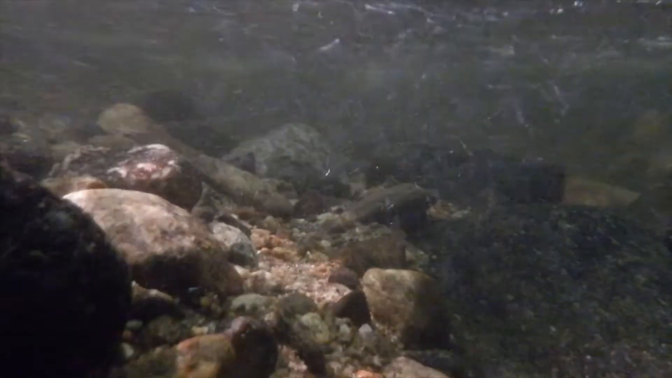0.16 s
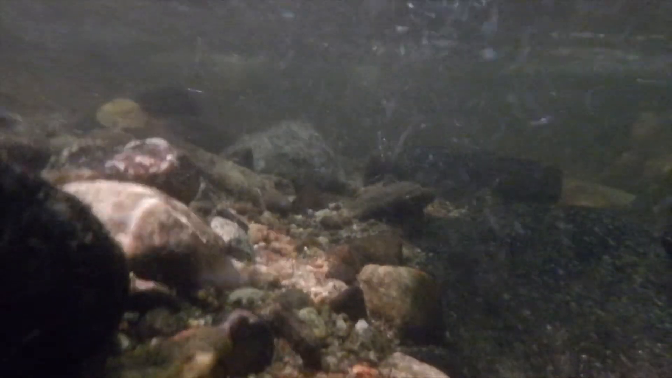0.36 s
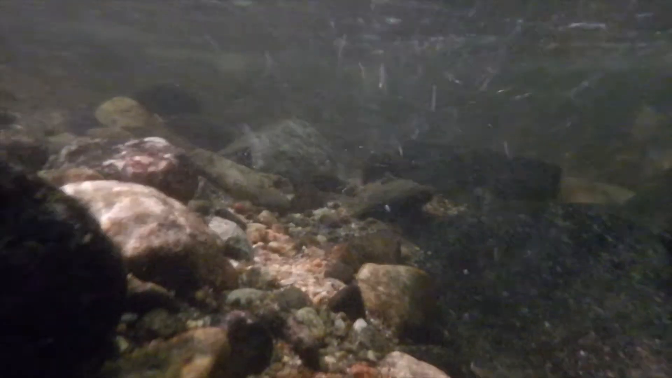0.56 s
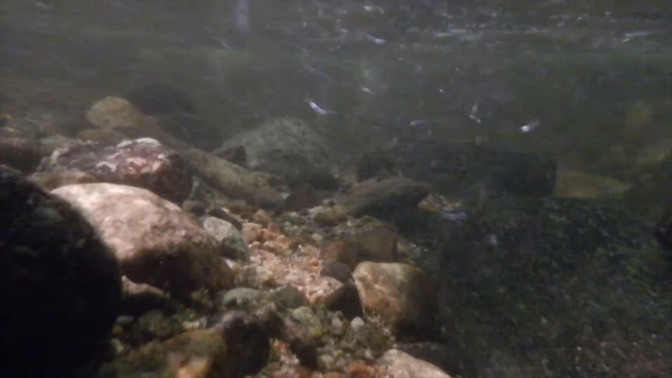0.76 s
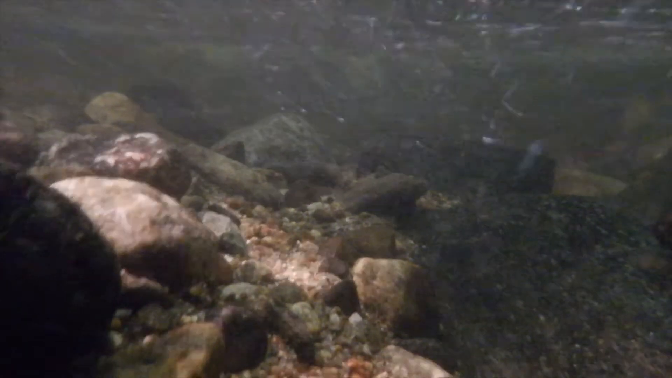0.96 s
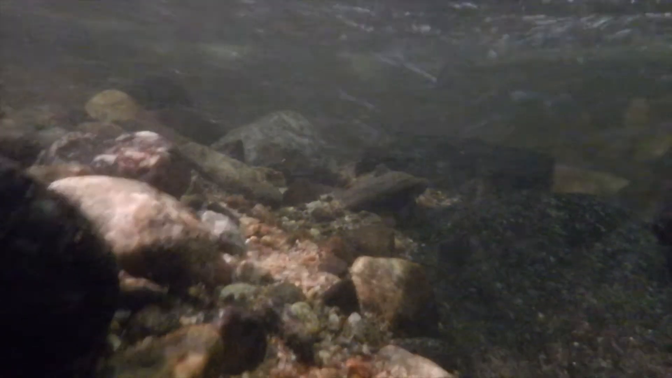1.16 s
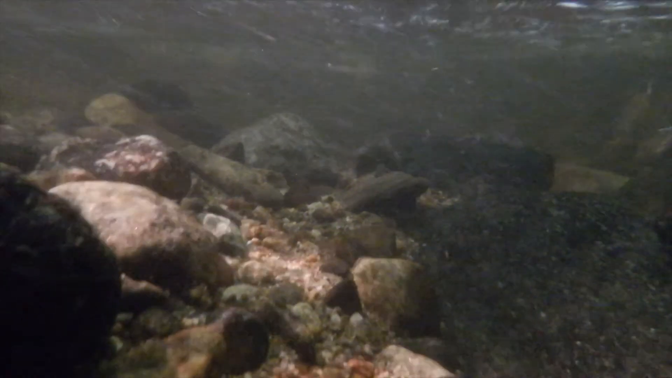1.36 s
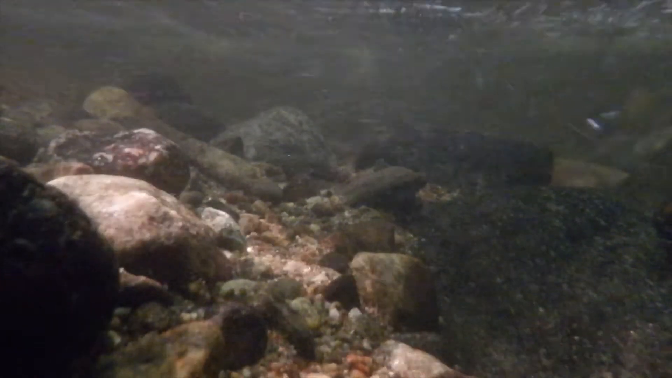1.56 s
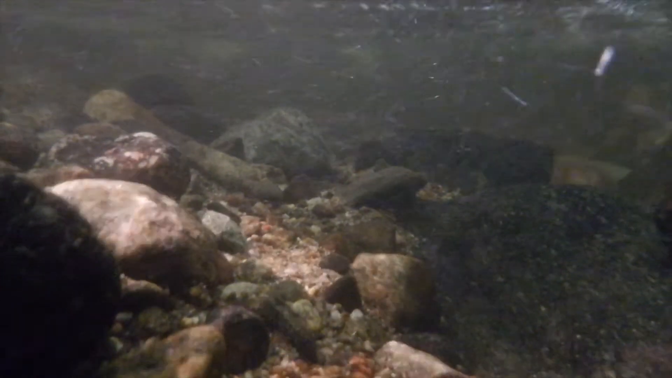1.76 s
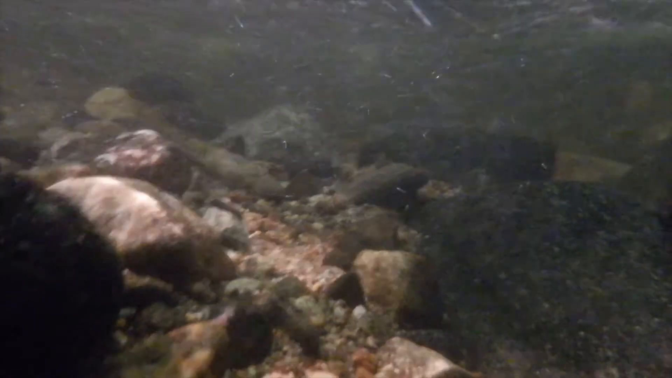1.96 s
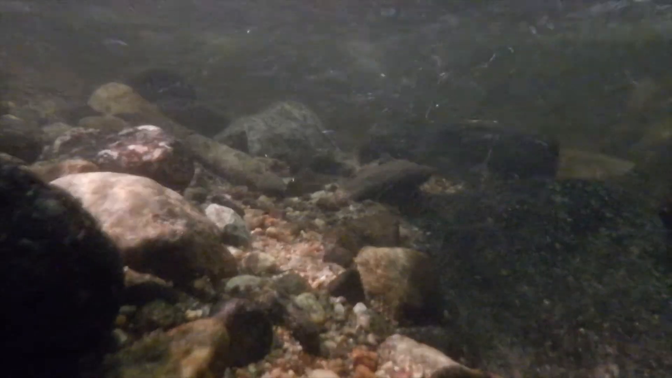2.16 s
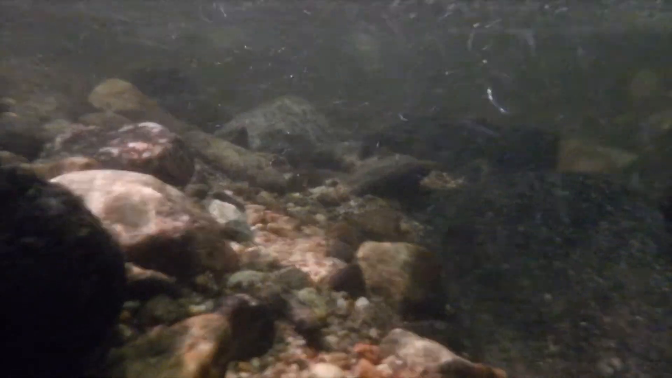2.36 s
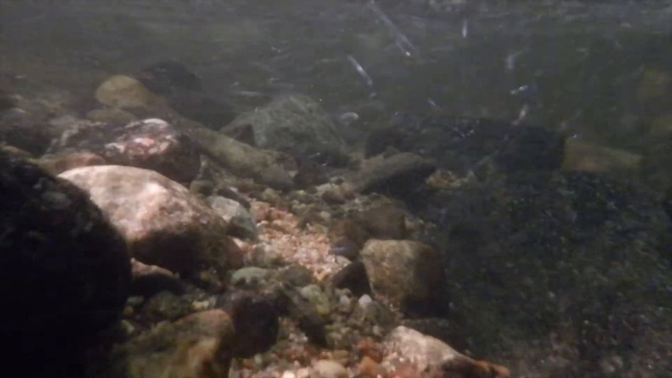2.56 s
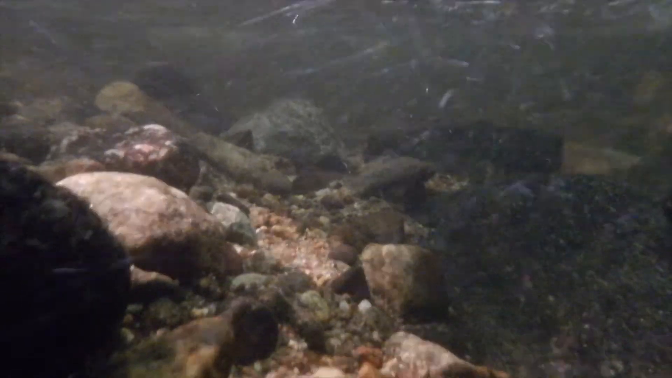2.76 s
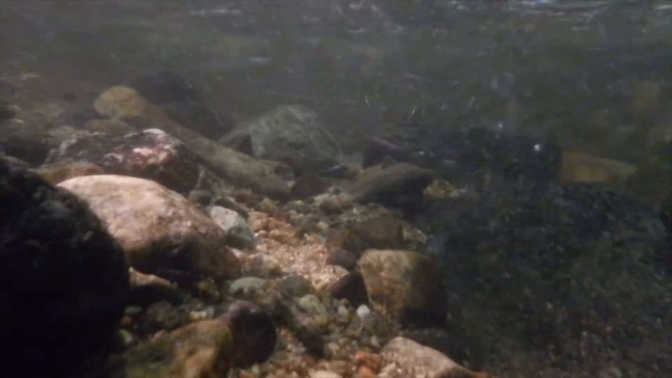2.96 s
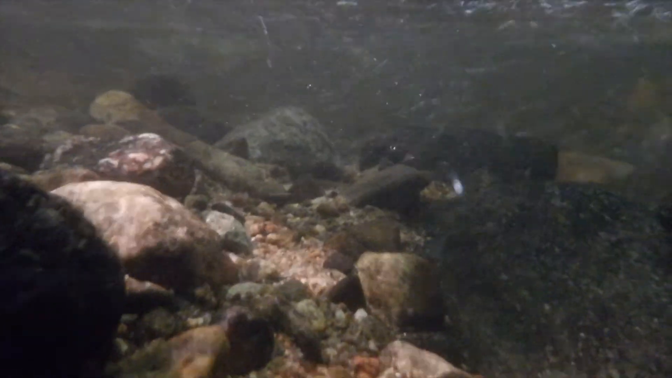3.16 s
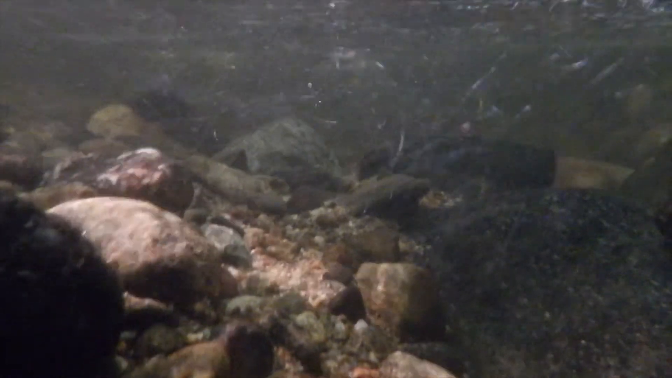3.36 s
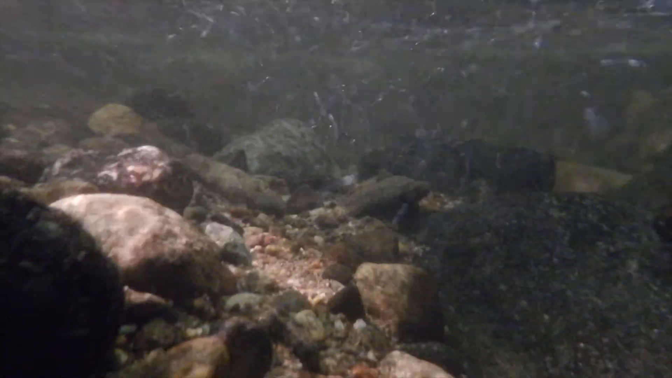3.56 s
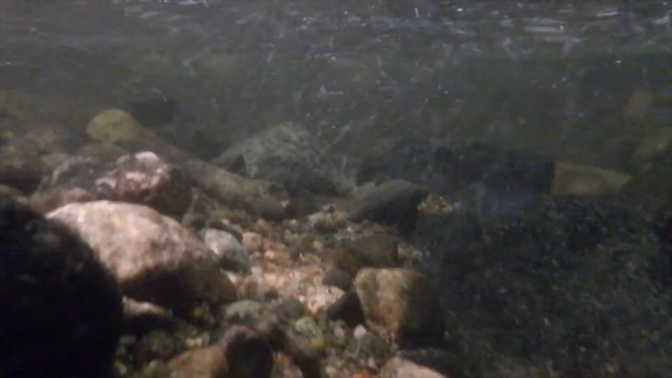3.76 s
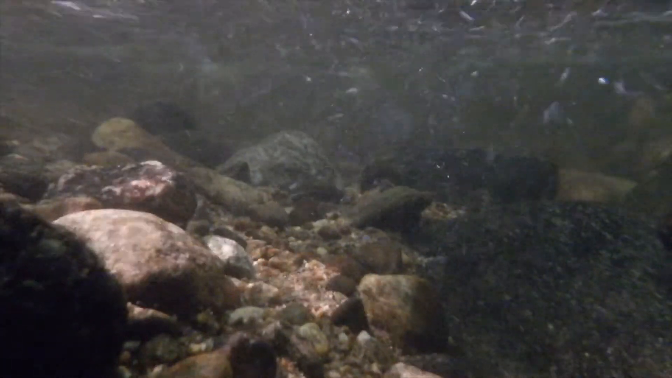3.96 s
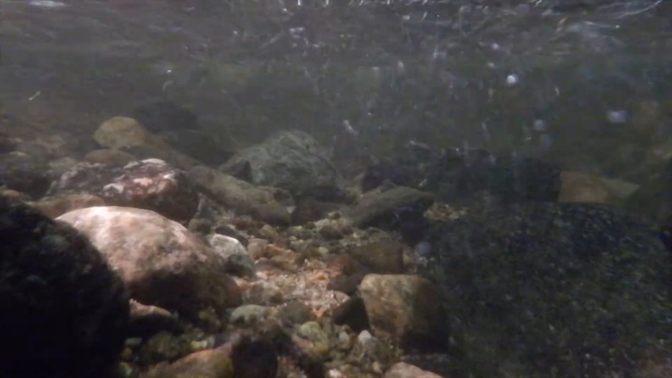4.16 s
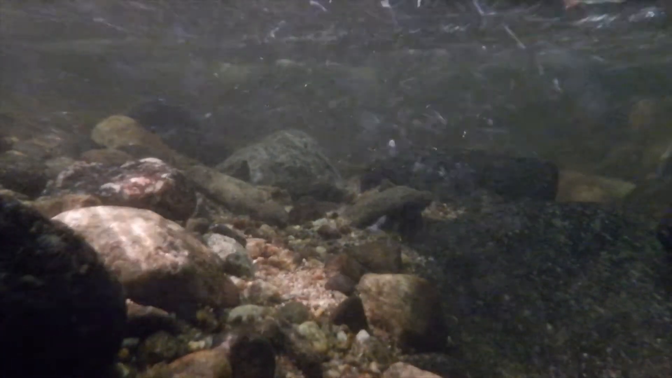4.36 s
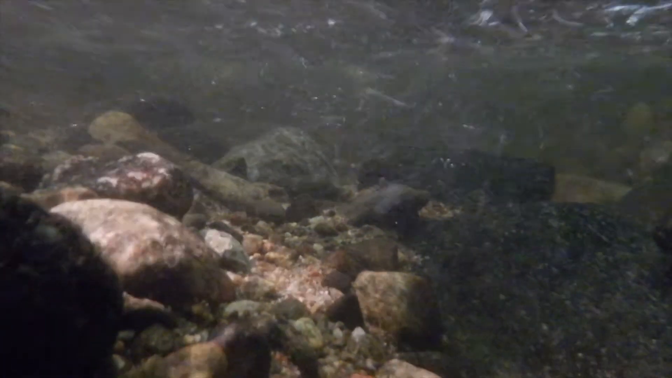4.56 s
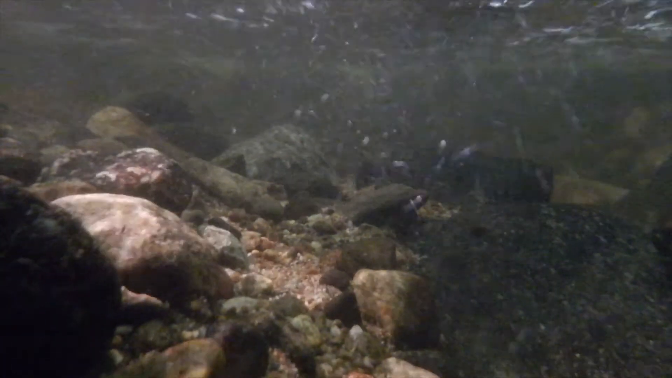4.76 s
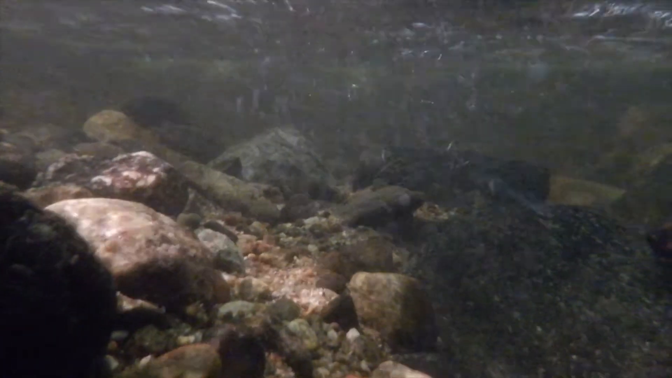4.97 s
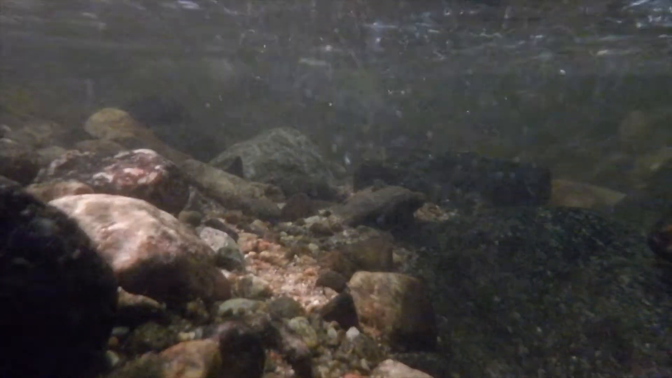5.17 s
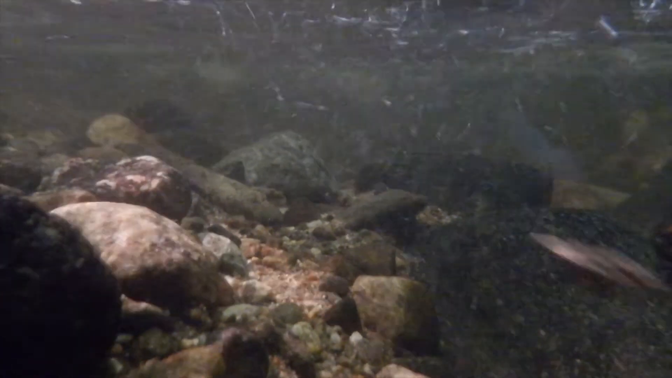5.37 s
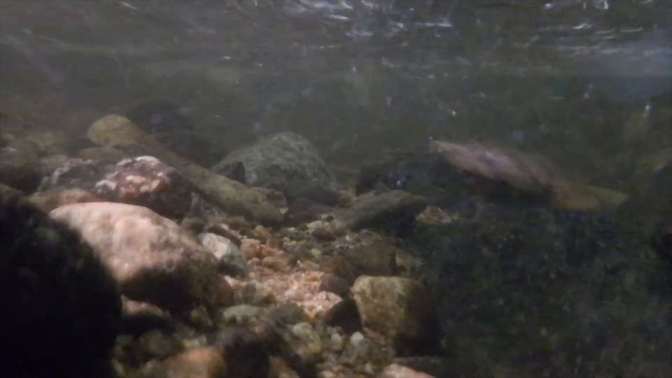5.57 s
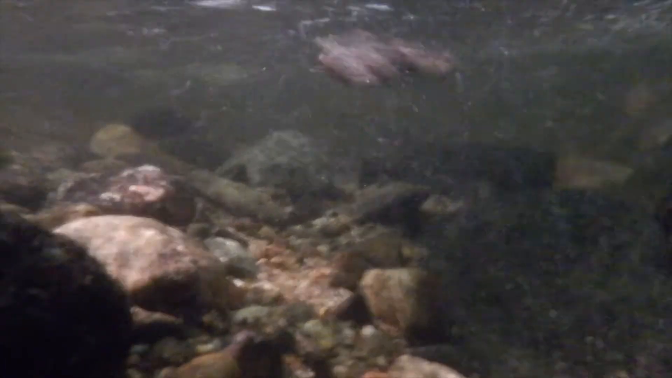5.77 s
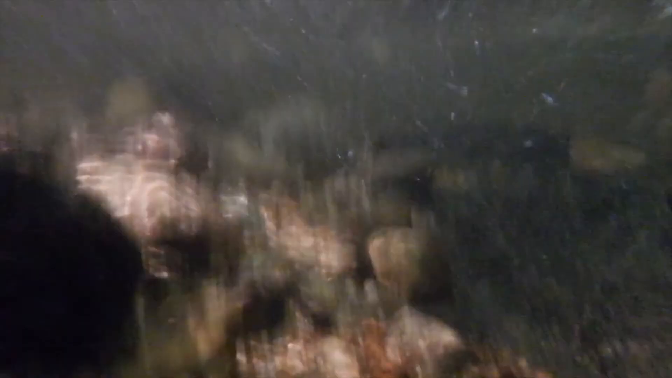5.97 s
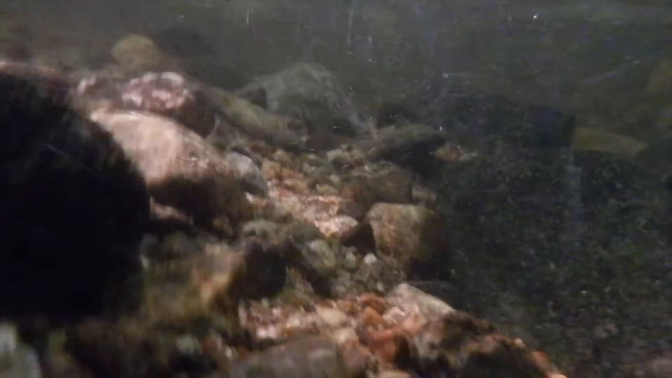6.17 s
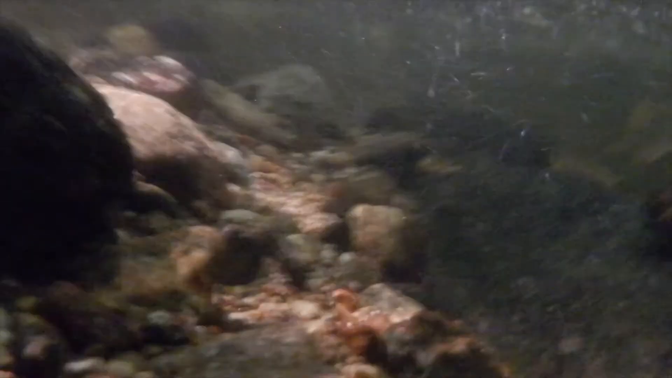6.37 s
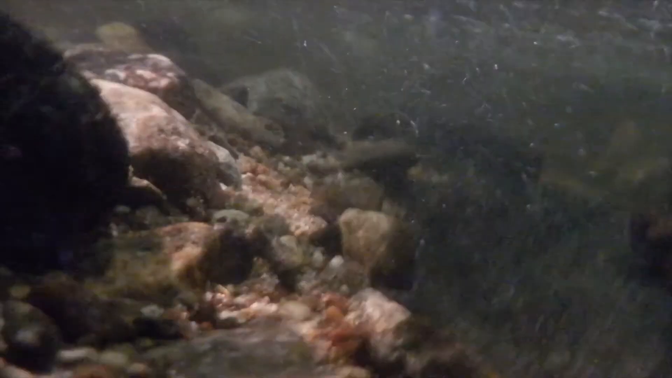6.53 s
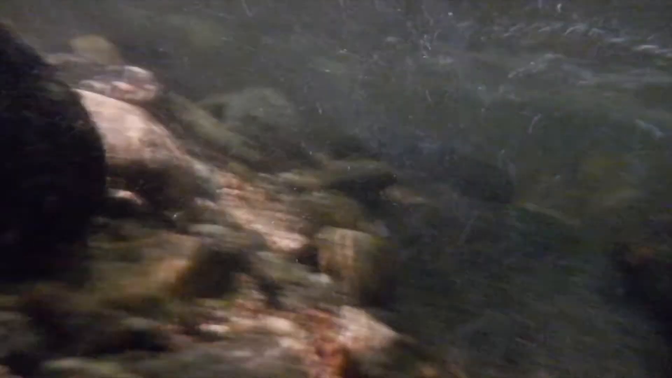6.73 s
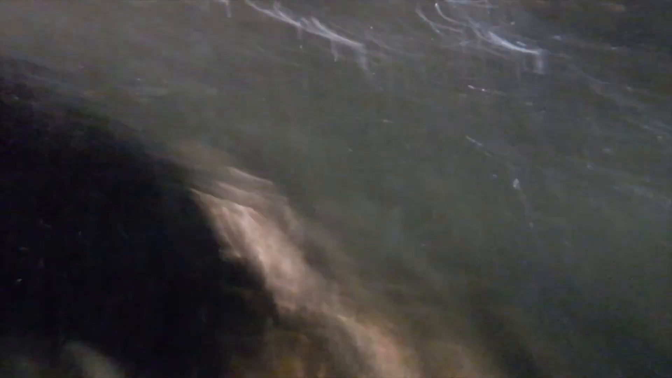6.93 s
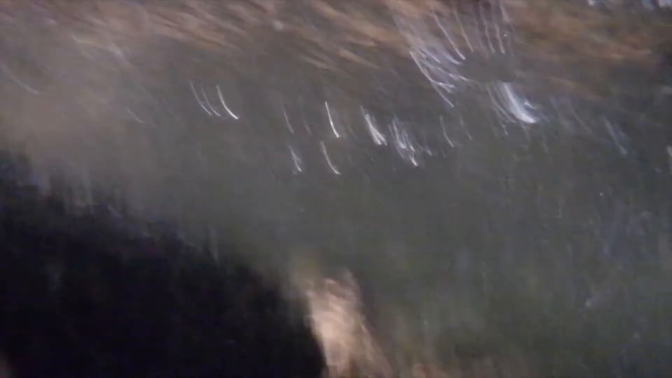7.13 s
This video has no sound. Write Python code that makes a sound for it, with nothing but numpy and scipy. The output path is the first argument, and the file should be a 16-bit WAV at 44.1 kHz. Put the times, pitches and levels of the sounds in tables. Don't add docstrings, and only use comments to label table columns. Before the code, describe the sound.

Muffled, lumpy underwater rumble of a shallow stream, broken by heavy booming knocks and one sharp crack as a submerged camera bumps stones.

```python
import sys
import numpy as np
from scipy import signal
from scipy.fft import rfft, irfft
from scipy.io import wavfile

SR = 44100
rng = np.random.default_rng(int(sys.argv[2]) if len(sys.argv) > 2 else 0)


def voltage_ratio(decibels):
    exponent = np.asarray(decibels, float) / 20
    return 10 ** exponent


def master_out(mix):
    frames = np.transpose(np.atleast_2d(mix))
    ceiling = np.clip(frames, -1, 1)
    pcm = np.round(ceiling * 32767).astype(np.int16)
    wavfile.write(sys.argv[1], SR, pcm)


N = 317520


def rms_one(x):
    return x / np.sqrt(np.mean(x ** 2) + 1e-20)


def coloured(x, points):
    hz, db = np.transpose(points)
    grid_hz = np.maximum(np.arange(len(x) // 2 + 1) * SR / len(x), 1)
    shape_db = np.interp(np.log(grid_hz), np.log(hz), db)
    return irfft(rfft(x) * voltage_ratio(shape_db), len(x))


def band(x, low_hz, high_hz):
    sos = signal.butter(2, [low_hz, high_hz], "band", fs=SR, output="sos")
    return signal.sosfilt(sos, x)


def drift(rate_hz):
    pole = np.exp(-80 * np.pi * rate_hz / SR)
    noise = rng.standard_normal(N // 40 + 2002)
    slow = signal.lfilter([1], [1, -2 * pole, pole * pole], noise)[2000:]
    return np.interp(np.arange(N) / 40, np.arange(len(slow)), rms_one(slow))


def in_time(rows):
    s, *columns = np.transpose(rows)
    return [np.interp(np.arange(N) / SR, s, column) for column in columns]


def add(out, s, burst):
    i = max(round(s * SR), 0)
    out[i:i + len(burst)] += burst[:N - i]


def ring(hz, t60_s, contact_s):
    t = np.arange(int(1.3 * t60_s * SR) + 64) / SR
    swell = 1 - np.exp(-(t / contact_s) ** 2)
    decay = voltage_ratio(-60 * (t / t60_s) ** 0.88)
    return swell * decay * np.sin(2 * np.pi * hz * t)


# (time [s], gain [dB])
DUCKS = [(0, -20.5), (2.385, -8.5), (2.501, -20), (5.05, -4.5), (5.72, -4.5), (5.89, -24.5), (5.95, -32),
         (6.501, -19.5), (6.72, -20), (7.149, -24)]
FULL_DB, DUCK_DB_PER_S, RECOVER_DB_PER_S = 0, 897.5, 23


def gain_control():
    t = np.arange(N) / SR
    dips = []
    for s, db in DUCKS:
        recover_db = RECOVER_DB_PER_S * (t - s)
        fall_db = DUCK_DB_PER_S * (s - t)
        dips.append(db + np.maximum(recover_db, fall_db))
    return np.minimum(np.min(dips, axis=0), FULL_DB)


# (time [s], level [dB])
FLOW = [(0, -25.5), (.5, -20), (.95, -20.5), (1.4, -16.5), (1.6, -24), (2.3, -20), (2.5, -23.5),
        (3.4, -19.5), (4.4, -22), (4.75, -18), (5.1, -24), (5.6, -18.5), (5.95, -21.5), (6.58, -28.5),
        (6.72, -3.5), (6.95, -17.5), (7.08, -12), (7.2, -23)]
# (frequency [Hz], density [dB per Hz])
RUMBLE_COLOUR = [(12, -36), (20, -12.5), (54, -5), (159, 2.5), (181, -2), (228, -8), (339, -35.5),
                 (418, -37.5), (549, -50), (3000, -79.5), (3900, -110), (6600, -120)]
HAZE_DB = -20.5
DEEP_DB, UPPER_DB, TILT_WANDER_DB = 8, -0.84, 2.5
DEEP_DUCKS = 0.64
LIFT_S, LIFT_DEEP_DB = 5.95, -18.5


def rumble(gain_db, lumpy_db, shared_db):
    rumble_db = in_time(FLOW)[0] + gain_db
    noise = rms_one(coloured(rng.standard_normal(N), RUMBLE_COLOUR))
    together_db = shared_db * drift(30.0)
    deep_db = DEEP_DB + TILT_WANDER_DB * drift(3.0)
    upper_db = UPPER_DB + TILT_WANDER_DB * drift(18.0)
    deep_db += (DEEP_DUCKS - 1) * gain_db
    deep_db += LIFT_DEEP_DB * (np.arange(N) > LIFT_S * SR)
    bands = [(10.1, 54.8, deep_db), (52.4, 85, -3.0), (110, 180, 0.0053), (215.4, 371, upper_db)]
    boom = 0
    for low_hz, high_hz, tilt_db in bands:
        level_db = rumble_db + tilt_db + lumpy_db * drift(1.6) + together_db
        boom = boom + band(noise, low_hz, high_hz) * voltage_ratio(level_db)
    boom = signal.sosfilt(signal.butter(3, 520, fs=SR, output="sos"), boom)
    haze = band(noise, 640, 2600) * voltage_ratio(HAZE_DB + gain_db + 0.85 * drift(8.5))
    return boom + haze


# (frequency [Hz], density [dB per Hz])
HISS_COLOUR = [(1200, -33.5), (2500, -5), (4000, -5.5), (8000, -4), (12000, -4), (16000, 1)]
WHINE_HZ = [9378, 5356, 15703]
# (level over hiss [dB], flicker [per s], flicker depth [dB])
WHINE = [(-14, 6.0, 5.5), (-23.5, 5.0, 2.5), (-11.5, 60.0, 4.5)]
# (time [s], level [dB])
WHINE_ON = [
    (0, -30),
    (1.75, -30),
    (1.85, 0),
    (2.75, 0),
    (4.65, 0),
    (4.75, -30),
    (7.2, -30),
]
HISS_DB, CONVERTER_DB = -75, -88
BLIP_FIRST_S, BLIP_EVERY_S, BLIP_HZ, BLIP_S = .0658, .06674, 12000, .003
BLIP_DB, BLIP_SPREAD_DB, WEAK_BLIP_DB = -2.5, 2.5, -4.5
CIRCUIT_TOP_HZ = 15850


def circuit(gain_db):
    t = np.arange(N) / SR
    tones = []
    for hz, (db, rate_hz, depth_db) in zip(WHINE_HZ, WHINE):
        tones.append(voltage_ratio(db + depth_db * drift(rate_hz)) * np.sin(2 * np.pi * hz * t))
    tones[0] = tones[0] * voltage_ratio(in_time(WHINE_ON)[0])

    turn = np.round((t - BLIP_FIRST_S) / BLIP_EVERY_S).astype(int) + 1
    spread_db = BLIP_SPREAD_DB * rng.standard_normal(turn[-1] + 1)[turn]
    blip_db = BLIP_DB + WEAK_BLIP_DB * (turn % 2) + spread_db
    from_blip_s = t - BLIP_FIRST_S - (turn - 1) * BLIP_EVERY_S
    blips = voltage_ratio(blip_db) * np.exp(-(from_blip_s / BLIP_S) ** 2) * np.sin(2 * np.pi * BLIP_HZ * t)

    hiss = rms_one(coloured(rng.standard_normal(N), HISS_COLOUR)) + sum(tones) + blips
    converter = voltage_ratio(CONVERTER_DB) * band(rng.standard_normal(N), 300, 13000)
    noise = voltage_ratio(HISS_DB + gain_db) * hiss + converter
    return signal.sosfilt(signal.ellip(10, .5, 40, CIRCUIT_TOP_HZ, fs=SR, output="sos"), noise)


# (frequency [Hz], t60 [s])
SHELL = [(340, .022), (590, .02), (800, .016), (1130, .022), (1500, .012), (2050, .01), (2800, .008)]
# (time [s], level [dB], fall per mode [dB], spot [0 rim - .5 middle])
TAPS = [(.002, -41.5, -1.5, .02), (.920, -57, -2, 0.16), (2.101, -41, -7.5, 0.028), (2.303, -22, -5, .25),
        (2.310, -33.5, -15, .02), (2.328, -39, -5, 0.051), (2.347, -45, -7, .02), (2.3645, -41.5, -2, .38),
        (3.786, -38, -10, 0.28), (4.336, -49, -9, 0.018), (4.741, -43.5, -1, .25),
        (4.861, -35.5, -10.5, .42), (5.012, -34.5, -4.5, 0.0209), (5.627, -44, -4, .4),
        (5.645, -47.5, -0.5, .25), (5.76, -37.5, -2, 0.11), (5.803, -55, 0, 0.016), (5.818, -32, -1, .45),
        (5.8661, -21.5, -6.5, .02), (5.868, -24.5, -1.5, .25), (6.4308, -10.5, -7.5, .02),
        (6.51, -46, -8, 0.017), (6.654, -28, -3.5, 0.25), (6.852, -46, -2, 0.19), (6.925, -49.5, -6, .24),
        (6.9891, -28, -3, 0.023), (7.016, -18.5, -20, .02), (7.031, -9, -10, .23), (7.064, -15, -18, 0.28),
        (7.074, -28.5, -18, .02)]


def taps():
    out = np.zeros(N)
    extra_db = [1.5, 0.5, 2, -5.5, -0.5, -1.5, -9.0]
    for s, db, fall_db, spot in TAPS:
        for k, (hz, t60_s) in enumerate(SHELL):
            shape = np.hypot(np.cos((k + 1) * np.pi * spot), .05)
            level = voltage_ratio(db + 5.5 + k * fall_db + extra_db[k])
            add(out, s, level * shape * ring(hz, t60_s, contact_s=0.001))
    return out


# (time [s], peak [dB])
TICKS = [(0.002, -46), (5.6765, -52), (5.6795, -53.5), (5.6855, -51), (2.306, -47.5), (2.314, -53),
         (2.351, -61), (2.364, -53.5), (5.013, -50.5), (5.821, -66), (5.866, -59.5), (5.870, -50),
         (6.431, -52.5), (6.658, -66), (6.989, -49)]


def ticks():
    out = np.zeros(N)
    noise = rng.standard_normal((len(TICKS), 256))
    t = np.arange(256) / SR
    for (s, db), grains in zip(TICKS, noise):
        add(out, s, voltage_ratio(db) * np.exp(-t / 0.00073) * grains)
    return band(out, 2500, 15000)


# (time [s], peak [dB], length [s])
CRACK = [(0.004, -51, 0.00094), (2.311, -46.5, 0.0056), (2.36, -45.5, 0.0055), (4.74, -50, 0.0014),
         (5.032, -64, 0.002), (5.646, -39.5, 0.0029), (5.6537, -25, 0.0011), (5.6560, 4, .0008),
         (5.6573, -9.5, 0.0018), (5.676, -42.5, .0015), (5.679, -55, 0.00081), (5.684, -36, 0.0028),
         (5.82, -44, 0.0027), (2.318, -53.5, .014), (2.343, -61, 0.0091), (5.695, -53.5, .008)]
# (frequency [Hz], density [dB per Hz])
CRACK_COLOUR = [(240, -41), (400, -5.5), (765, 3), (1090, -10.5), (1510, -2), (2180, -8.5), (2510, -17),
                (2930, -7.5), (3310, -36.5), (3870, -26.5), (4110, -51), (5030, -24.5), (7170, -17.5),
                (14100, -26.5), (16000, -36.5)]
# (frequency [Hz], level [dB], t60 [s])
CRACK_RING = [(1840, -28, 0.045), (3730, -38, 0.037), (5500, -58, 0.02)]


def crack():
    out = np.zeros(N)
    noise = rng.standard_normal((len(CRACK), 1024))
    t = np.arange(1024) / SR
    for (s, db, length_s), grains in zip(CRACK, noise):
        envelope = (1 - np.exp(-t / 0.000095)) * np.exp(-(t / length_s) ** 2)
        add(out, s, voltage_ratio(db) * envelope * grains)
    out = voltage_ratio(6.5) * coloured(out, CRACK_COLOUR)
    main_s = CRACK[7][0]
    for hz, db, t60_s in CRACK_RING:
        add(out, main_s, voltage_ratio(db) * ring(hz, t60_s, contact_s=0.00059))
    return out


# (time [s], peak [dB], pitch
# [Hz])
SLAPS = [(.462, -18.5, 67), (.632, -2, 58.1), (1.353, -22, 65.6), (2.052, -24.5, 52.4),
         (2.693, -23.5, 36.5), (3.399, -13.5, 112.7), (3.495, -6.5, 63), (3.54, -13.5, 86),
         (3.677, -9, 58.7), (4.004, -14.5, 85), (4.27, -13.5, 121.4), (4.391, -15, 49.3),
         (4.41, -9.5, 60.6), (4.472, -10.5, 111), (5.017, 1.5, 63.6), (5.173, -9.5, 83.6), (5.809, 0, 115),
         (5.8705, -2, 92.2)]
SLAP_CYCLES = .8
# (time [s], peak [dB], pitch [Hz], length [cycles])
SWELLS = [(0.536, -24, 81.5, 4.8), (0.797, -19, 134.3, 3.1), (1.1, -25.5, 259, 10), (.95, -18, 168.3, 9.8),
          (1.06, -20.5, 145.7, 8.3), (1.165, -15, 77.8, 3.5), (1.29, -21, 232, 8.9), (1.305, -19, 85, 7.5),
          (1.413, -14, 205, 4.7), (1.503, -25, 86, 3.6), (1.51, -8, 161.7, 3.87), (1.723, -14.5, 165.4, 5),
          (1.762, -10.5, 37, 1.43), (1.799, -4.5, 152, 2.6), (1.821, -16, 52.2, 5.2), (1.79, -20, 224, 5.1),
          (3.223, -12.5, 138, 2.4), (3.313, -18, 91, 5.1), (3.742, -17.5, 37.6, 1.7),
          (3.793, -16.5, 181, 7.1), (4.109, -12.5, 152, 1.5), (4.681, -17.5, 85, 5.5),
          (4.815, -17.5, 161, 5.3), (5.063, -7, 77, 1.33), (5.226, -15, 83.1, 5.2),
          (5.486, -16.5, 158, 4.5), (5.568, -9, 140.6, 3.44), (5.772, -8, 77.4, 1.6),
          (6.83, -19.5, 76.7, 4.7), (7.102, -12, 150.6, 5.4)]


def surges():
    out = np.zeros(N)
    slaps = [(*slap, SLAP_CYCLES) for slap in SLAPS]
    for s, db, hz, cycles in [*slaps, *SWELLS]:
        spread_s = np.clip(cycles, .4, 9) / hz / 2.36
        t = np.arange(-4 * spread_s, 4 * spread_s, 1 / SR)
        envelope = np.exp(-(t / spread_s) ** 2 / 2)
        add(out, s + t[0], -voltage_ratio(db) * envelope * np.cos(2 * np.pi * hz * t))
    return out


# (time [s], peak [dB], frequency [Hz], t60 [s])
PINGS = [(.57, -62, 1320, .02), (.92, -57, 1300, 0.022), (1.73, -56.5, 5160, 0.0083),
         (4.669, -62, 5400, 0.013), (5.8656, -5.5, 327, 0.047), (6.4308, -12.5, 522, 0.014),
         (6.4316, -15, 689, 0.017), (6.4312, -26, 1080, 0.019), (6.9886, -12, 560, 0.047),
         (7.015, -14, 560, 0.028), (7.031, -17, 520, 0.028)]


def pings():
    out = np.zeros(N)
    for s, db, hz, t60_s in PINGS:
        add(out, s, voltage_ratio(db) * ring(hz, t60_s, 0.42 / hz))
    return out


# (time [s], length [s], level [dB])
SCRAPES = [(2.073, 0.094, -60), (2.289, 0.052, -52), (5.613, 0.11, -45.5), (5.802, 0.033, -60.5),
           (6.44, 0.077, -68), (6.667, 0.033, -65), (6.802, 0.1, -62.5), (6.896, 0.054, -63.5),
           (7.022, 0.068, -54)]


def scrapes():
    hits = rng.standard_normal(N) * (rng.random(N) < 2500 / SR)
    grains = hits * voltage_ratio(3.0 * rng.exponential(1, N).clip(0, 3))
    grains = rms_one(band(band(grains, 220, 720), 280, 1800))
    stroke = np.zeros(N)
    for s, length_s, db in SCRAPES:
        add(stroke, s, voltage_ratio(db) * np.hanning(int(length_s * SR)) ** .5)
    return stroke * grains


# (time [s], peak [dB], frequency [Hz], t60 [s])
KNOCKS = [(2.299, 6, 110, 0.082), (2.308, 3, 80.5, 0.081), (2.32, 2.5, 60.5, 0.056), (2.346, .5, 110, 0.15),
          (2.356, 7, 76.8, 0.081), (2.421, -6.5, 110, 0.054), (2.434, 2, 104.2, .12),
          (5.656, -1.5, 134.9, 0.26), (5.676, -1, 55.2, 0.094), (5.684, -3, 142.6, 0.15),
          (5.8136, 3.5, 140, 0.069), (5.875, 0, 128, 0.087), (5.986, -28.5, 124, 0.062),
          (6.4394, -10, 139.8, 0.13), (6.509, -28.5, 152.6, 0.16), (6.655, 0, 158, .13),
          (6.842, -8.5, 155, 0.069), (6.919, -18.5, 139.7, .059), (6.9948, 0, 159.5, 0.11),
          (7.014, 5.5, 164.8, 0.041), (7.03, -11, 138.4, 0.15), (7.056, -5, 110, 0.14),
          (7.07, -6, 148.5, .11)]
CONTACT_CYCLES = .3
# (time [s], peak [dB], frequency [Hz], t60 [s], direction [+1 or -1])
RAPS = [(5.8643, 3.5, 160, 0.022, 1), (6.4314, 8.5, 205, 0.027, 1), (6.9883, 5.5, 199, 0.032, -1)]
RAP_CONTACT_S = 0.0011


def knocks():
    out = np.zeros(N)
    for s, db, hz, t60_s in KNOCKS:
        contact_s = CONTACT_CYCLES / hz + 0.00083
        add(out, s, -voltage_ratio(db + 3.5) * ring(hz, t60_s, contact_s))
    for s, db, hz, t60_s, direction in RAPS:
        add(out, s, direction * voltage_ratio(db) * ring(hz, t60_s, RAP_CONTACT_S))
    return band(out, 41, 750)


def scene():
    gain_db = gain_control()
    water = rumble(gain_db, lumpy_db=-0.79, shared_db=2.5) + surges()
    housing = knocks() + taps() + pings() + crack() + ticks() + scrapes()
    return (water + housing + circuit(gain_db))[None]


def top_cut(x):
    return signal.sosfilt(signal.butter(12, 16500, fs=SR, output="sos"), x)


CUTOFF_HZ = 16450


def record(dry):
    knee = 16.0
    mix = dry / (1 + np.abs(dry / 1.07) ** knee) ** (1 / knee)
    mix = signal.sosfilt(signal.ellip(10, .5, 60, CUTOFF_HZ, fs=SR, output="sos"), mix)
    return top_cut(mix)


dry = scene()
out = record(dry)
master_out(out)
```